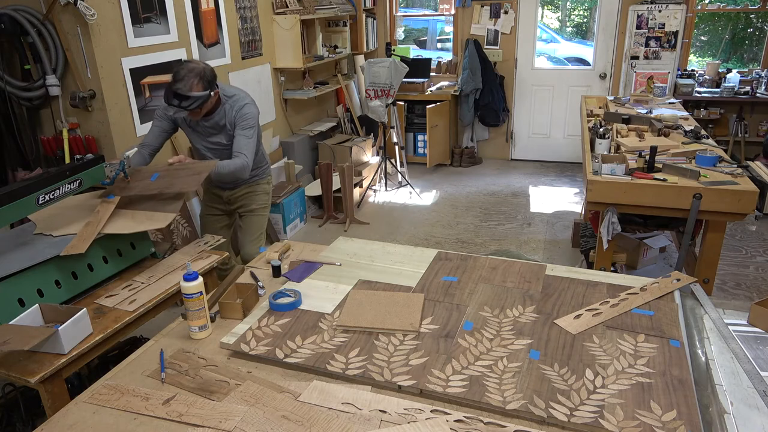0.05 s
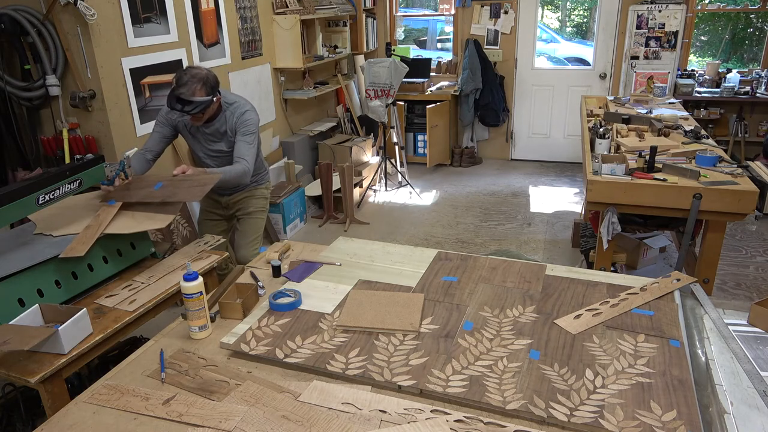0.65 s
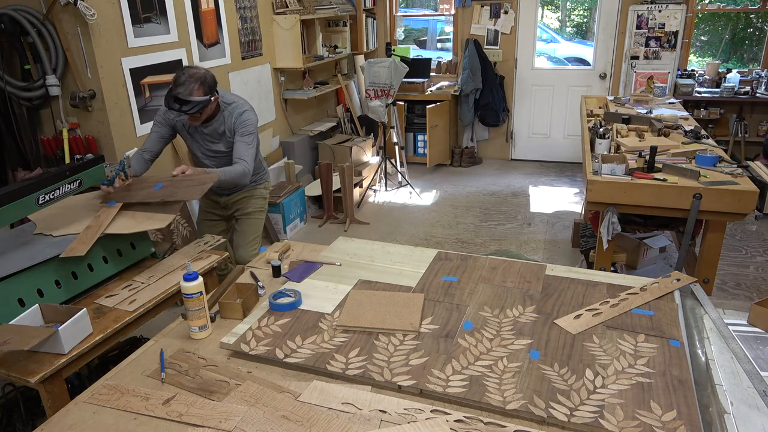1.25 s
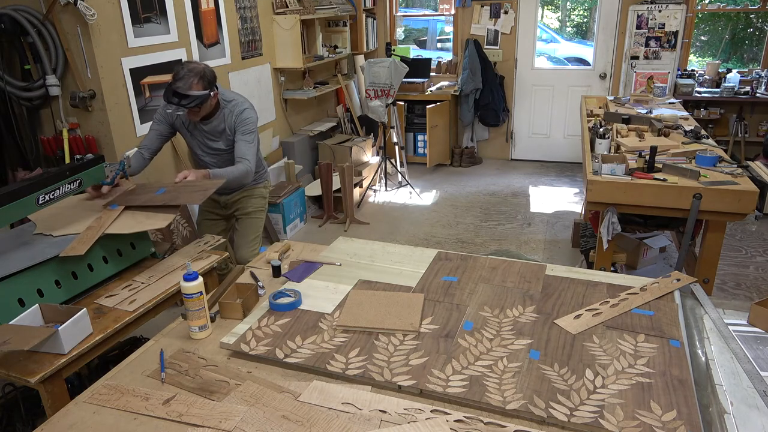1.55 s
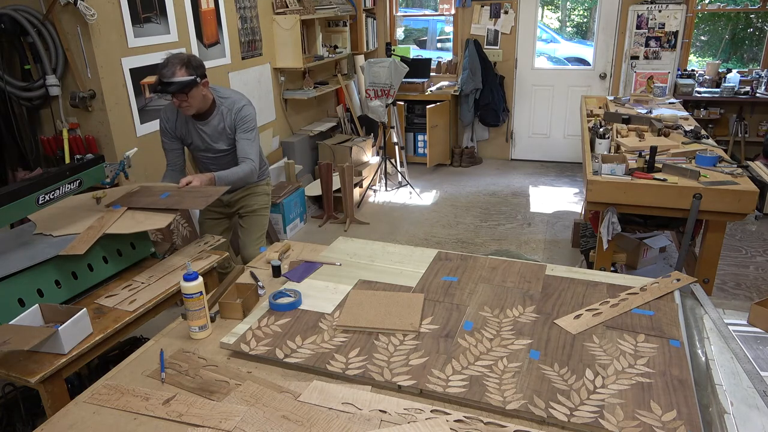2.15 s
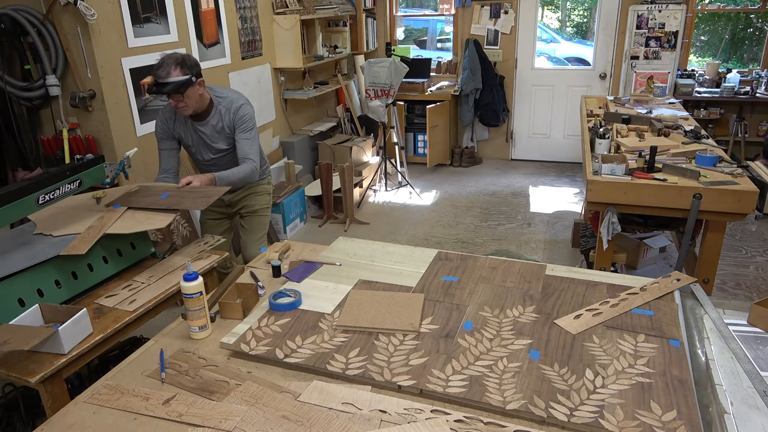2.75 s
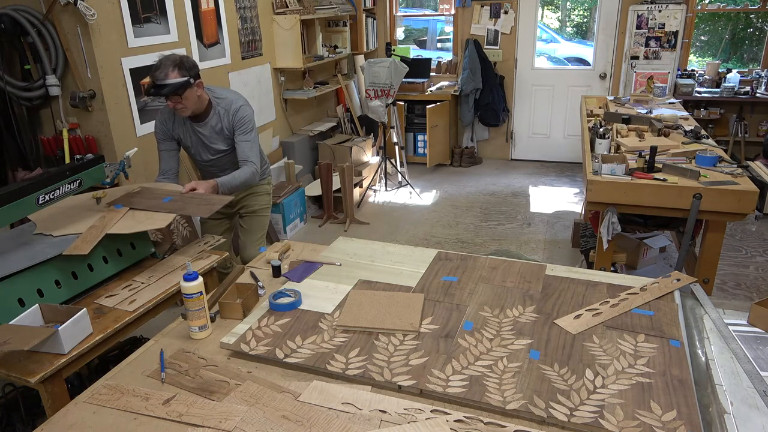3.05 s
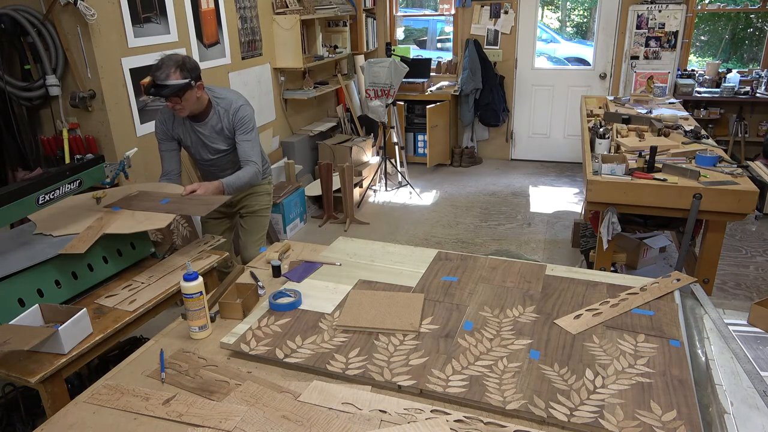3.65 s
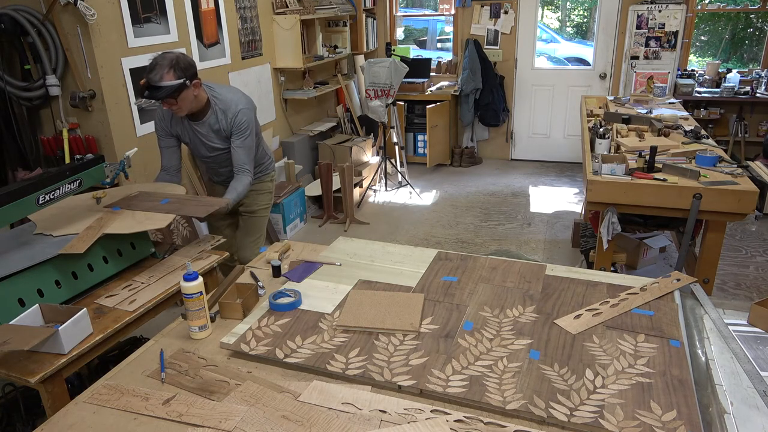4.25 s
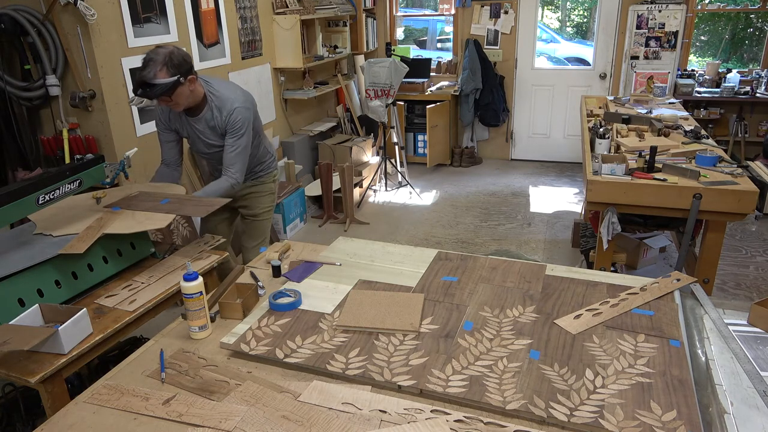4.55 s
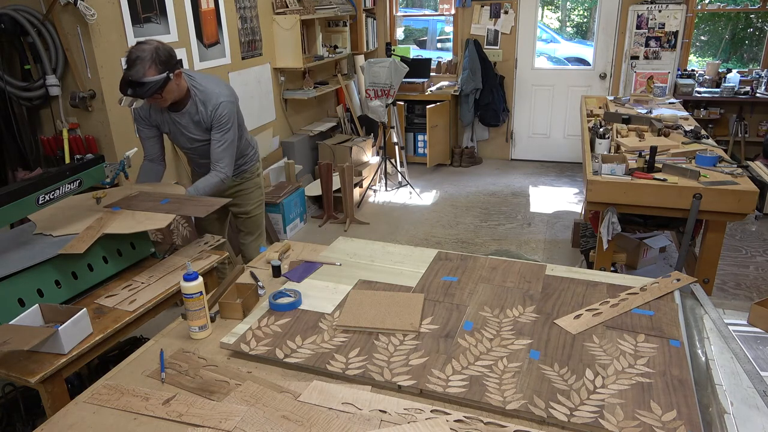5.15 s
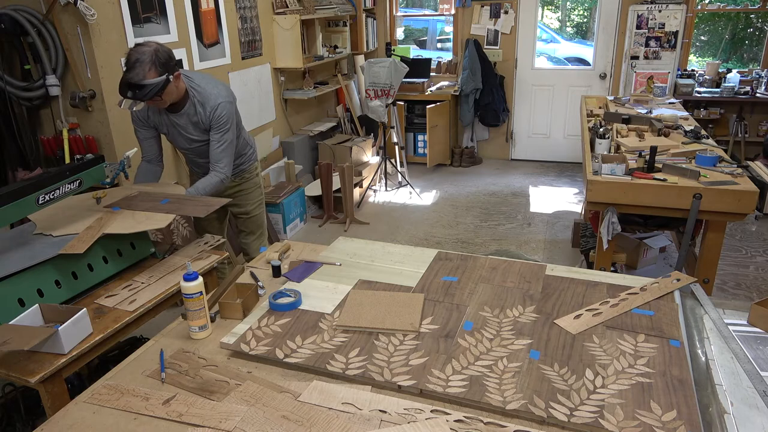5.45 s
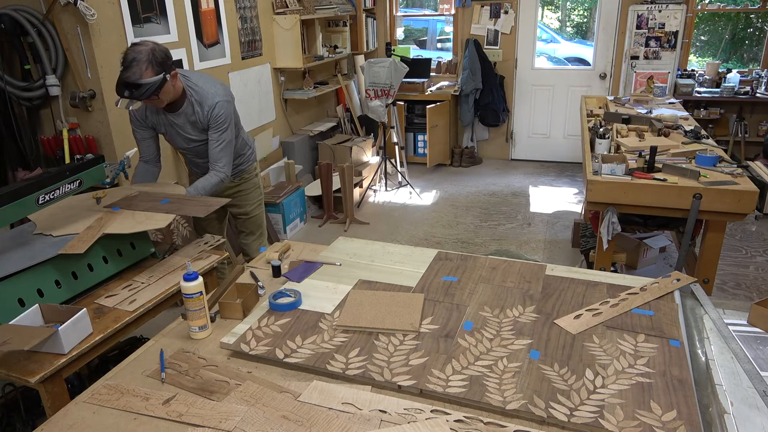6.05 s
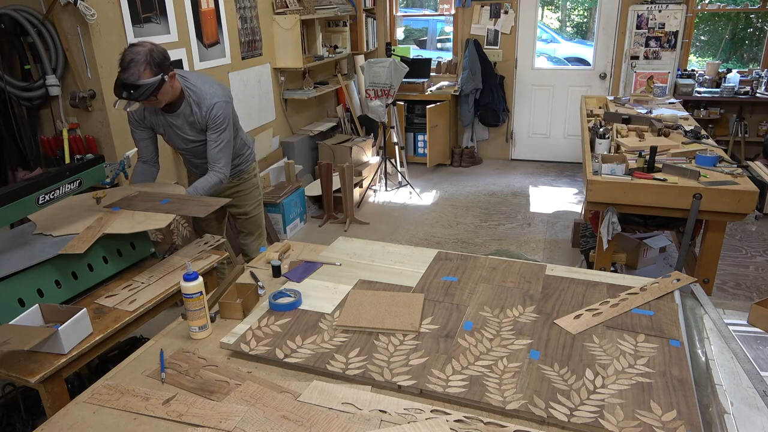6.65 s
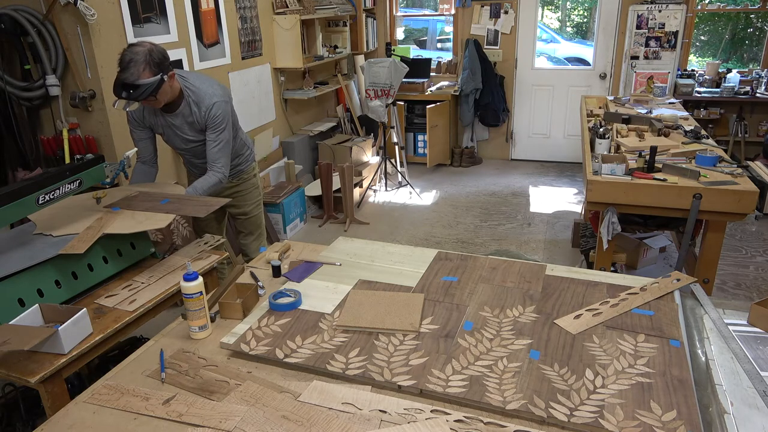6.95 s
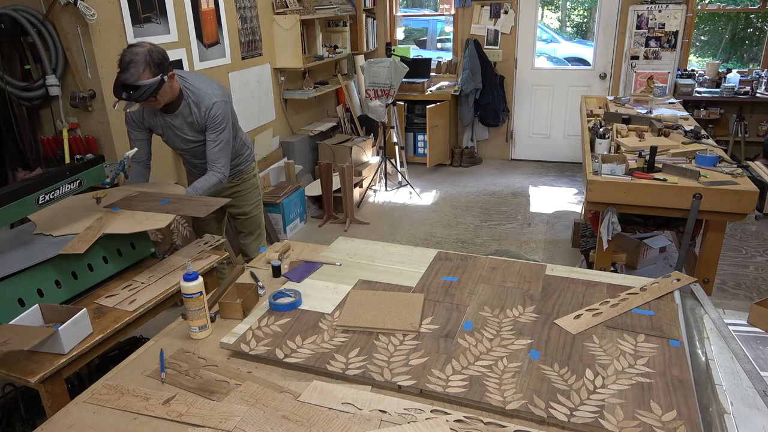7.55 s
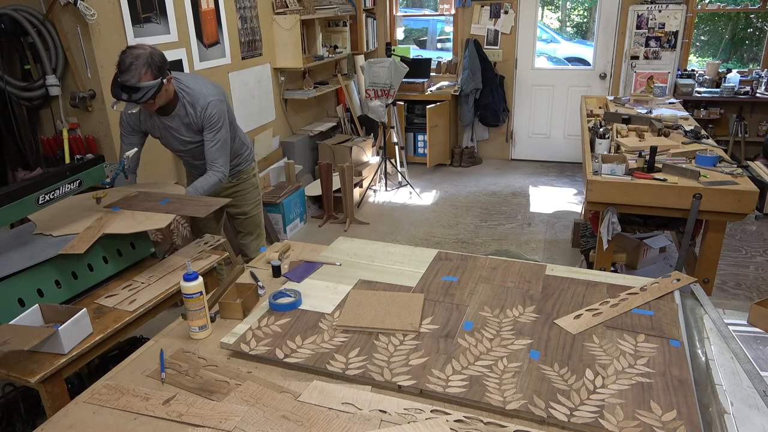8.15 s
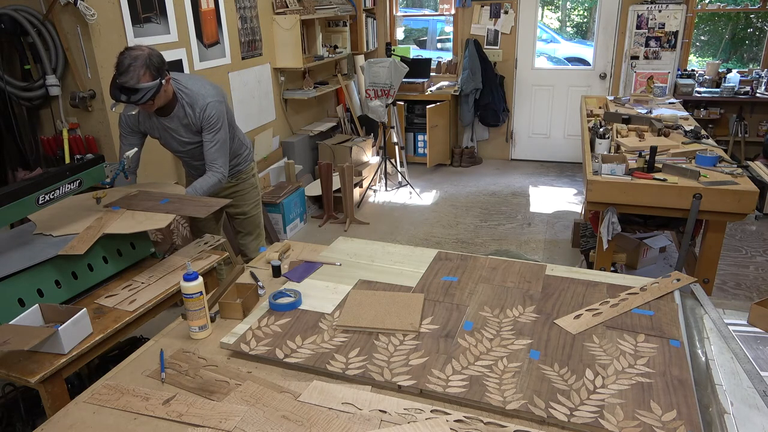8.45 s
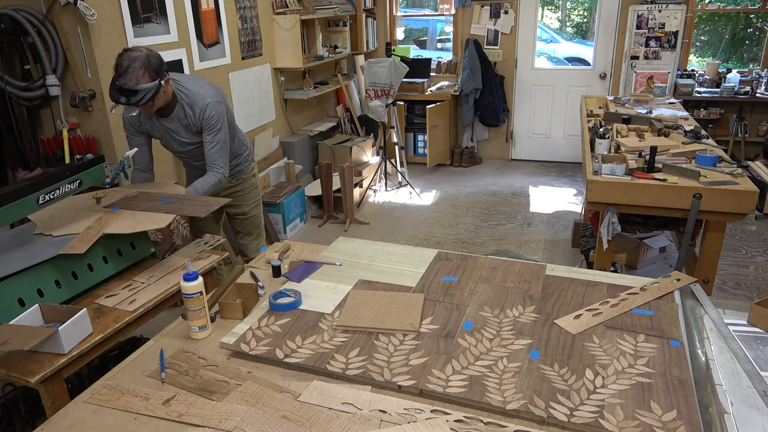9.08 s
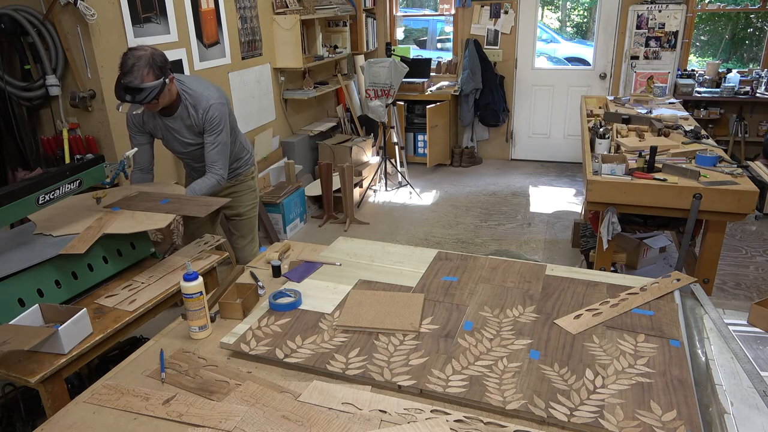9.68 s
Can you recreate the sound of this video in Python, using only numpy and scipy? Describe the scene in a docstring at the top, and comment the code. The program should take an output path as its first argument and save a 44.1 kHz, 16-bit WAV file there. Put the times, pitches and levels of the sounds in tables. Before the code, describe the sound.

A fan hums faintly throughout in a small workshop, heard in stereo from a few metres away; each contact leaves a tail of about half a second. Thin wood veneer slides softly at the start, with light clinks of small steel tools. At 1.6 seconds a handle is set down, and at 1.8 a strip cracks and slaps onto the pile, the loudest moment. From about 2.5 to 5 seconds, sheets rustle in short pushes among light taps, with brighter tool clinks at 3.6 and 4.8. An edge gives a brief high squeak at 5.3, then a fainter one and a few dry ticks. After a quieter stretch of sparse taps, several wooden knocks land on the bench between 8 and 9.2 seconds, strongest at 8.5 and with a low thump at 9.1, around another short slide. A tick and a light tap follow near 9.7.

```python
"""A sheet of veneer slides and ticks, then steel clinks: a woodworker is sorting a bench a few metres
from a stereo microphone in a small workshop. A handle is put down and a strip slaps onto the pile,
the loudest moment. Sheets rustle as their fibres catch, an edge sticks and slips in a squeak, small
tools ring, and things knock on the bench top towards the end. A fan hums faintly behind it all,
and the room gives every contact a tail of a good half second."""
import sys
import numpy as np
from scipy import signal
from scipy.fft import rfft, irfft, next_fast_len
from scipy.io import wavfile
from scipy.ndimage import uniform_filter1d

SR = 44100
rng = np.random.default_rng(int(sys.argv[2]) if len(sys.argv) > 2 else 0)


def persist_wave(psi):
    """Save psi, clipped to +-1, as 16-bit WAV."""
    counts = np.round(np.clip(psi, -1, 1) * 32767).astype(np.int16)
    wavfile.write(sys.argv[1], SR, np.atleast_2d(counts).T)


N = 433062
SIZE = 32768  # samples in one ring or room tail
T = np.arange(SIZE) / SR

# Firm blows on wood: t/s, thump/dB, body/dB, edge/dB, snap/dB, chatter/s
STRIP_SLAP = [(1.777, -23, -11.5, -19.5, -28.5, 0.0079), (1.79, -18.5, -11.5, -31.5, -32.5, 0.028),
              (1.807, -28, -15, -22.5, -31.5, 0.044)]  # the strip's face lands and flaps
HANDLE_DOWN = [(1.631, -29, -18.5, -27.5, -38, 0.0024)]
BENCH_KNOCKS = [(8.054, -27.5, -33, -34, -49, 0.0063), (8.33, -22, -39.5, -56.5, -88, 0.0051),
                (8.464, -27.5, -14.5, -21.5, -33.5, 0.0055), (8.951, -33, -38.5, -32, -44.5, 0.0057),
                (9.136, -15.5, -21, -33, -46, 0.011)]
# Resonances of each wooden thing: f/Hz, width/Hz, level/dB
VENEER_RING = [(306, 25, 4.5), (770, 21, -20), (1120, 88, -1), (1373, 120, -3.5), (1860, 490, -7.5),
               (2414, 600, -5.5), (3100, 130, -9.5)]
HANDLE_RING = [(476, 140, 11), (860, 89, -17), (1410, 86, 3.5), (1680, 250, 15.5), (2190, 122, 14),
               (2930, 130, 8.5), (3160, 62, 4.5), (4260, 110, 8), (6010, 62, 9.5)]
BENCH_RING = [(178, 17, 7), (387, 120, -7.5), (491, 14, 2.5), (799, 32, 9), (1036, 98, 2), (1243, 54, 3),
              (1780, 58, 1), (1980, 160, 4.5), (2320, 170, 5), (2830, 290, 0), (3250, 64, 5),
              (3800, 490, -6), (6060, 580, -11)]
# The pile booms under the slap: f/Hz, level/dB
PILE_BOOM = [(65, -68.5), (122, -50.5), (267, -35), (304, -33.5), (363, -33), (651, -34)]
# The bench frame takes a load: t/s, level/dB, f/Hz
FRAME_THUDS = [(2.325, -60, 182), (4.717, -60, 126), (8.336, -57, 182), (8.954, -51.5, 182),
               (9.138, -78, 70), (9.138, -62, 182)]

# Steel tools touch: t/s, tool, ring/dB, click/dB, chatter/s
TOOL_CLINKS = [ (0.134, "blade", -46, -47, 0.0052), (0.808, "tweezers", -66, -53.5, 0.014),
               (0.834, "tweezers", -55.5, -61, .004), (0.879, "tweezers", -55, -61, .004),
               (1.297, "pin", -53, -57.5, 0.0033), (2.471, "ruler", -60.5, -59.5, .002),
               (2.592, "ruler", -60, -74, 0.0041), (3.555, "knife", -37.5, -39, 0.012),
               (3.568, "knife", -41.5, -37, 0.01), (4.768, "scalpel", -38.5, -37.5, 0.0016),
               (5.052, "scalpel", -53.5, -56, 0.00039), (5.896, "ruler", -64, -58, 0.00096), ]
# Resonances of each steel tool: f/Hz, width/Hz, level/dB
TOOL_RING = { "blade": [(1653, 8.9, 2.5), (3240, 25, -1), (4440, 28, -6), (5040, 27, -2.5),
             (5940, 33, -5.5), (8060, 34, -6), (10750, 85, -2), (13100, 40, -8)],
             "tweezers": [(2300, 30, 1.5), (2900, 47, -7), (4280, 29, -2.5), (5900, 45, -8), (8240, 30, -8),
             (8700, 30, -11), (10600, 28, -6), (12000, 40, -6), (13040, 40, -12)],
             "ruler": [(1670, 28, 0.5), (3360, 20, 3), (4880, 40, -2), (5800, 50, -1), (7840, 50, -8)],
             "pin": [(5970, 40, -16.5), (10800, 24, -14), (11800, 82, -11)], "knife": [(1885, 57, -0.5),
             (3190, 100, -5.5), (4990, 75, -4), (6880, 110, -1.5), (8600, 100, -15), (8790, 160, 5.5),
             (10200, 60, -16), (11500, 140, 4), (13700, 90, -16)], "scalpel": [(4330, 72, -5),
             (7400, 37, -25), (10740, 110, -4), (11200, 82, -1), (12900, 240, 6), (13400, 150, -8)], }

# Light taps on the pile: t/s, level/dB, hardness/(dB per octave), extra bass/dB
PILE_TAPS = [(0.636, -64, -4, -24), (2.32, -56.5, 0, 13.5), (2.472, -54.5, -0.5, -14),
             (2.591, -50.5, 3, -16), (3.008, -47, -1, -10), (3.063, -39.5, -2, -9), (3.518, -48.5, -0.5, 3),
             (3.868, -59.5, 2.5, 6), (4, -50, -3, 1.5), (4.089, -38.5, -2.5, 1.5), (4.168, -43.5, 1, 6),
             (4.322, -56.5, 4, 2), (4.709, -41.5, -3.5, 3), (5.894, -53.5, -2, -7), (6.213, -58.5, 2.5, 0),
             (7.234, -51, -3.5, 3), (7.464, -52, -3.5, 2), (8.398, -57, -1.5, 25), (9.745, -45, -3.5, -10)]
# Brittle ticks of the veneer's edge: t/s, level/dB, hardness/(dB per octave)
EDGE_TICKS = [(0.0345, -65.5, 8), (0.0868, -58.5, 2.5), (5.5184, -60.5, 3), (5.6043, -51.5, 3.5),
              (5.645, -54, 0), (6.559, -61, 0.5), (9.4652, -52, -4), (9.679, -38.5, -5.5)]
# Colour of a tap and of a tick before hardness tilts it: f/Hz, level/dB
TAP_COLOUR = [(70, -29), (210, -11), (300, -1), (800, -2), (1900, 2), (3300, -0.5), (6000, -3),
              (9000, -5.5), (13000, -12.5), (16000, -20)]
TICK_COLOUR = [(70, -38), (300, -11), (800, -13), (1900, -3), (3300, 1), (6000, 1.5), (9000, 0.5),
               (13000, -1.5), (16000, -11)]
# Sheets are pushed along: t/s, length/s, rubbing/dB, fibre hiss/dB
SHEET_PUSHES = [(0.0, 0.088, -50.5, -46.5), (1.218, 0.15, -61, -51.5), (1.33, 0.13, -62, -52.5),
                (1.427, 0.12, -58, -48.5), (2.74, 0.21, -63.5, -57.5), (2.949, 0.12, -52, -51),
                (3.12, 0.16, -53, -53), (3.276, 0.13, -54, -48), (3.39, 0.17, -60.5, -53.5),
                (4.062, 0.079, -44, -44), (4.123, .15, -55, -59), (4.436, 0.14, -56, -56),
                (4.55, 0.2, -59, -65), (4.712, 0.047, -43, -51), (4.717, 0.058, -55.5, -36),
                (4.927, 0.085, -59.5, -79), (5.4, 0.1, -51.5, -64), (7.12, 0.086, -62, -68),
                (7.75, 0.18, -58, -94), (8.814, 0.062, -51, -58), (8.873, 0.13, -40, -62)]
# An edge sticks and slips: t/s, length/s, slip rate/Hz, level/dB
EDGE_SQUEAKS = [(5.295, 0.055, 3800, -43), (5.448, 0.071, 3740, -57)]

# Colour of the fan's wash and the still air: f/Hz, level/dB
AIR_COLOUR = [(25, -13.5), (55, 0.5), (85, -5), (125, 2.5), (300, -0.5), (470, -3.5), (640, 3.5), (1000, 0),
              (1150, -3), (1370, -1.5), (1520, -7.5), (2300, -10.5), (4000, -14), (9000, -14),
              (16000, -18.5)]
# Fan tones: f/Hz, width/Hz, level/dB
FAN_TONES = [(356.3, 19, -78), (709, 25, -85), (1028, 30, -75.5), (1307, 52, -67.5)]
# Reverberation time of the shop: f/Hz, t60/s
SHOP_DECAY = [(100, 0.82), (300, 0.79), (900, 0.64), (2500, 0.5855), (6000, 0.5662), (14000, 0.32)]
# Standing waves of the shop: f/Hz, width/Hz, level/dB
STANDING_WAVES = [(123.2, 4, -2), (182, 3.25, 5.5), (275.5, 13, 4), (302, 3.2, 9), (362.5, 10, 6.5),
                  (501, 8.6, 11.5), (646, 2.1, 4.5), (777, 6.2, 11), (970, 3.1, 9.5), (1132, 3.7, 6)]
# First echoes off bench and wall: delay/s, level/dB
FIRST_ECHOES = [(.0048, -1), (.0098, -5)]
# Stereo width of the room at the microphone: f/Hz, side minus mid/dB
STEREO_WIDTH = [(60, -5), (200, -6.5), (600, -12.5), (1200, -13.5), (2400, -18.5), (4500, -14),
                (8000, -1.5), (14000, -6)]
# Colour of the microphone's two ports: f/Hz, left minus right/dB
PORT_BALANCE = [(180, -0.5), (380, 2.5), (650, 6), (1200, -1.5), (3500, -0.5), (8000, 0.5), (14000, 1)]


def wood_blows(blows, modes, direct_db):
    """Firm blows ring the wood and the room; the hardness of each sets its colour."""
    out, tail = np.zeros((2, N)), room_tail()
    for s, thump, body, edge, snap, chatter_s in blows:
        sound = rap(modes, chatter_s, tail + undb(direct_db) * direct_path())
        # small boards radiate almost no bass; only hard, bright contacts reach the very top
        top = snap + np.clip(0.34 * (snap - edge), -9, 2)
        tone = [(70, thump - 27), (210, thump - 10), (300, thump), (800, body), (1900, body - 1.5),
                (3300, edge + 2.2), (6000, edge - 1.5), (9000, snap + 4.4),
                (13000, top - 1.5), (16000, top - 10.5)]
        add(out, s, colour(sound, tone))
    return out


def edge_crack(s=1.7675, crack_db=-22, chatter_s=0.00081, room_db=-4):
    """The strip's stiff edge cracks on the pile just before its face lands."""
    out = np.zeros((2, N))
    crack = undb(crack_db) * strike(contact(chatter_s), direct_path() + undb(room_db) * room_tail())
    tone = [(40, -9.5), (300, -2.5), (1500, 3.5), (4000, -1), (8000, -0.5), (15000, -16)]
    add(out, s, colour(crack, tone))
    return out


def thuds(slap_s=1.795, width_hz=40, diffuse_db=-4, direct_db=-8):
    """Soft, low thuds of the pile and the bench frame mostly feed the shop's standing waves."""
    out = np.zeros((2, N))
    tail = undb(diffuse_db) * room_tail() + ring(STANDING_WAVES)
    for s, db, hz in FRAME_THUDS + [(slap_s, db, hz) for hz, db in PILE_BOOM]:
        thud = colour(ring([(hz, width_hz, 0)]), [(hz / 2, -12), (hz, 0), (2 * hz, -9), (10 * hz, -40)])
        add(out, s, undb(db) * strike(thud, tail + undb(direct_db) * direct_path()))
    return out


def steel_clinks(brightest_hz=8800, ring_direct_db=-4):
    """Small tools click together; their high modes ring briefly and the room holds the note."""
    out, tail = np.zeros((2, N)), room_tail()
    click_tone = [(150, -16), (1800, -5), (brightest_hz, 2), (2 * brightest_hz, -7)]
    for s, tool, ring_db, click_db, chatter_s in TOOL_CLINKS:
        click = colour(strike(contact(chatter_s), direct_path() + tail), click_tone)
        note = strike(ring(TOOL_RING[tool]), tail + undb(ring_direct_db) * direct_path())
        add(out, s, undb(click_db) * click + undb(ring_db) * note)
    return out


def taps(chatter_s=0.0058, direct_db=-6, bass_below_hz=500):
    """Fingers and sheets tap the pile; weight behind a tap adds bass."""
    out, tail = np.zeros((2, N)), room_tail()
    for s, level_db, hardness, bass_db in PILE_TAPS:
        tap = rap(VENEER_RING, chatter_s, tail + undb(direct_db) * direct_path())
        tone = [(hz, db + bass_db * (hz < bass_below_hz)) for hz, db in hardened(TAP_COLOUR, hardness)]
        add(out, s, undb(level_db) * colour(tap, tone))
    return out


def ticks(chatter_s=0.002, direct_db=3):
    """The veneer's edge catches and lets go in one short, dry tick."""
    out, tail = np.zeros((2, N)), room_tail()
    for s, level_db, hardness in EDGE_TICKS:
        tick = rap(VENEER_RING, chatter_s, tail + undb(direct_db) * direct_path())
        add(out, s, undb(level_db) * colour(tick, hardened(TICK_COLOUR, hardness)))
    return out


def slides(rub_trim_db=-2, hiss_trim_db=-3, grit_db=5, catches_per_s=1200, jerk_db=3):
    """Sheet slides on sheet in small jerks: fibres catch in dense clicks that ring the veneer."""
    rub, hiss = 0, 0
    for s, length_s, rub_db, hiss_db in SHEET_PUSHES:
        speed = stroke(s, length_s, swell_share=0.46)
        rub += undb(rub_db + rub_trim_db) * speed
        hiss += undb(hiss_db + hiss_trim_db) * speed
    sizes = undb(grit_db * np.minimum(rng.exponential(size=N), 4)) * rng.choice([-1, 1], N)
    jerks = undb(jerk_db * unit(uniform_filter1d(rng.standard_normal(N), size=700)))
    catches = jerks * sizes * (rng.random(N) < catches_per_s / SR)
    rustle = catches + signal.fftconvolve(catches, ring(VENEER_RING))[:N]
    sheet = colour(rustle, [(70, -13), (150, -5), (290, 1), (600, 4.5), (1200, 1), (2300, -7.5),
                            (4500, -23), (9000, -65)])
    fibres = colour(rustle, [(500, -54.5), (1800, -4.5), (3000, 5.5), (4500, 2), (6500, 3.5),
                             (10000, -0.5), (15000, -5.5)])
    return across_shop(rub * unit(sheet) + hiss * unit(fibres), direct_db=-1.8)


def squeaks(wobble=0.075, overtone_db=-9, sharp_share=0.17, settle_s=0.0075):
    """Short, unsteady stick-slip squeaks with two overtones; each starts sharp and settles."""
    t, out = np.arange(N) / SR, 0
    unsteady = unit(uniform_filter1d(rng.standard_normal(N), size=40))
    for s, length_s, hz, db in EDGE_SQUEAKS:
        sharpness = sharp_share * np.exp(-np.maximum(t - s, 0) / settle_s)
        slip_hz = hz * (1 + sharpness) * (1 + wobble * unsteady)
        phase = 2 * np.pi * np.cumsum(slip_hz) / SR
        tone = sum(undb(overtone_db * k) * np.sin((k + 1) * phase) for k in range(3))
        out += undb(db) * unit(tone) * stroke(s, length_s, swell_share=0.2)
    return across_shop(out, direct_db=-4.5)


def fan(air_db=-63.5):
    """Room tone: soft air from all sides, with narrow, restless fan tones in the centre."""
    out = undb(air_db) * unit(colour(diffuse(N), AIR_COLOUR))
    size = next_fast_len(N)
    bins_hz = np.fft.rfftfreq(size, 1 / SR)
    for hz, width_hz, db in FAN_TONES:
        resonance = 1 / (1 + ((bins_hz - hz) / (width_hz / 2)) ** 2)
        hum = irfft(rfft(rng.standard_normal(size)) * resonance)[:N]
        out += undb(db) * unit(hum)
    return out


def room_tail(build_s=0.00066, standing_db=-1):
    """The shop's reverberation: each band dies at its own rate and standing waves sing on."""
    spectrum, tail = rfft(diffuse(SIZE)), 0
    for band_hz, t60 in SHOP_DECAY:
        band = on_log_axis([(hz, hz == band_hz) for hz, _ in SHOP_DECAY], SIZE)
        tail += irfft(spectrum * band) * np.exp(-np.log(1000) * T / t60)
    onset = 1 - np.exp(-T / build_s)
    return unit(tail * onset) / np.sqrt(SIZE) + undb(standing_db) * ring(STANDING_WAVES) * onset


def direct_path():
    """The straight path to the microphone and its echoes off bench and wall, at unit energy."""
    path = 1. * (T == 0)
    for delay_s, db in FIRST_ECHOES:
        path[int(delay_s * rng.uniform(.93, 1.07) * SR)] += undb(db)
    return unit(path) / np.sqrt(SIZE)


def across_shop(sound, direct_db):
    """A running sound as it reaches the microphone from a few metres off."""
    path = room_tail() + undb(direct_db) * direct_path()
    return signal.fftconvolve(sound[None], path, axes=1)[:, :N] / np.sqrt(1 + undb(2 * direct_db))


def diffuse(size):
    """Stereo noise as it arrives from all sides."""
    mid, side = rng.standard_normal((2, size))
    return mid + np.array([[1], [-1]]) * colour(side, STEREO_WIDTH)


def rap(modes, chatter_s, path, spot_db=4.5):
    """One contact rings a board; every spot on it favours other modes."""
    spot_modes = [(hz, width, db + spot_db * rng.standard_normal()) for hz, width, db in modes]
    board = (T == 0) + ring(spot_modes)
    return strike(signal.fftconvolve(contact(chatter_s), board)[:SIZE // 2], path)


def contact(chatter_s, grit_db=3):
    """One touch is a dying run of tiny impacts, together flat in spectrum."""
    impacts = rng.standard_normal(SIZE) * undb(grit_db * rng.standard_normal(SIZE))
    spectrum = rfft(impacts * np.exp(-T / chatter_s))
    smooth_power = uniform_filter1d(np.abs(spectrum) ** 2, size=80)
    return irfft(spectrum / np.sqrt(smooth_power))[:SIZE // 2]


def ring(modes):
    """Free ring of a set of resonances; each peaks at its own gain."""
    return sum(undb(db) * 2 * np.pi * width / SR * np.cos(2 * np.pi * hz * T)
               * np.exp(-np.pi * width * T) for hz, width, db in modes)


def strike(push, path):
    """Send a push down a stereo path; the attack has rms 1."""
    sound = signal.fftconvolve(push[None], path, axes=1)[:, :SIZE]
    attack = sound[:, :1323]  # first 30 ms
    return sound / np.sqrt(np.mean(attack ** 2))


def stroke(start_s, length_s, swell_share):
    """Speed of a push, 0-1: it gathers for a share of its length, then comes to rest."""
    progress = (np.arange(N) / SR - start_s) / length_s
    return np.interp(progress, [0, swell_share, 1], [0, 1, 0])


def hardened(tone, db_per_octave, pivot_hz=2500):
    """A harder contact tilts a colour towards the treble; below 800 Hz it keeps its shape."""
    return [(hz, db + db_per_octave * np.log2(max(hz, 800) / pivot_hz)) for hz, db in tone]


def colour(x, points):
    """Minimum-phase filter through (f/Hz, level/dB) points."""
    size = next_fast_len(x.shape[-1] // 2 + 1) * 2
    cepstrum = irfft(np.log(undb(on_log_axis(points, size))))
    cepstrum[1:size // 2] *= 2
    cepstrum[size // 2 + 1:] = 0
    return irfft(rfft(x, size) * np.exp(rfft(cepstrum)))[..., :x.shape[-1]]


def on_log_axis(points, size):
    """Join (f/Hz, value) points over the bins of a transform."""
    hz, value = np.transpose(points)
    bins_hz = np.arange(size // 2 + 1) * SR / size
    return np.interp(np.log(bins_hz + 1), np.log(hz), value)


def add(track, s, sound):
    """Mix a sound in at s seconds."""
    i = int(s * SR)
    track[..., i:i + sound.shape[-1]] += sound[..., :N - i]


def undb(db):
    """Decibels to gain."""
    return 10 ** (np.asarray(db) / 20)


def unit(x):
    """Scale to rms 1."""
    return x / np.sqrt(np.mean(x ** 2))


def scene():
    """The bench from a few metres away, over the fan."""
    handle = wood_blows(HANDLE_DOWN, HANDLE_RING, direct_db=-2.5)
    slap = wood_blows(STRIP_SLAP, VENEER_RING, direct_db=2.5)
    knocks = wood_blows(BENCH_KNOCKS, BENCH_RING, direct_db=-3.5)
    contacts = handle + slap + knocks + edge_crack() + taps() + ticks() + steel_clinks() + thuds()
    return contacts + slides() + squeaks() + fan()


def record(dry, top_hz=16200):
    """The stereo microphone leans left in the low middle; the top is cut steeply."""
    left = colour(dry[0], [(hz, db / 2) for hz, db in PORT_BALANCE])
    right = colour(dry[1], [(hz, -db / 2) for hz, db in PORT_BALANCE])
    low_pass = signal.ellip(10, .2, 70, top_hz, fs=SR, output="sos")
    return signal.sosfilt(low_pass, np.array([left, right]))


dry = scene()
out = record(dry)
persist_wave(out)
```